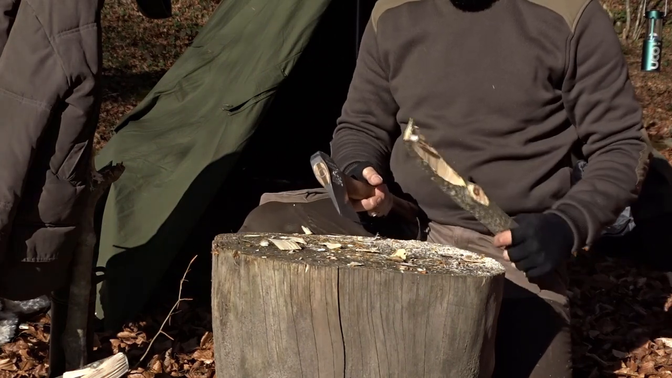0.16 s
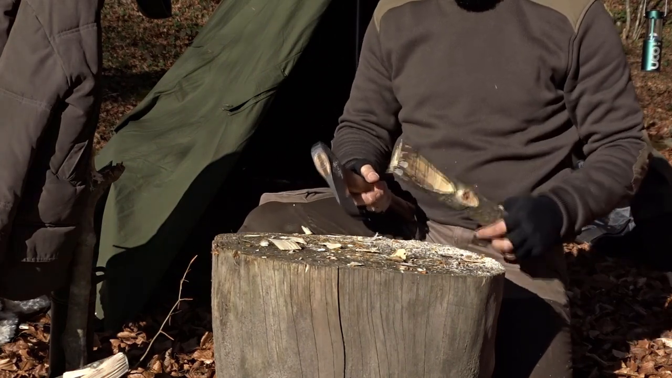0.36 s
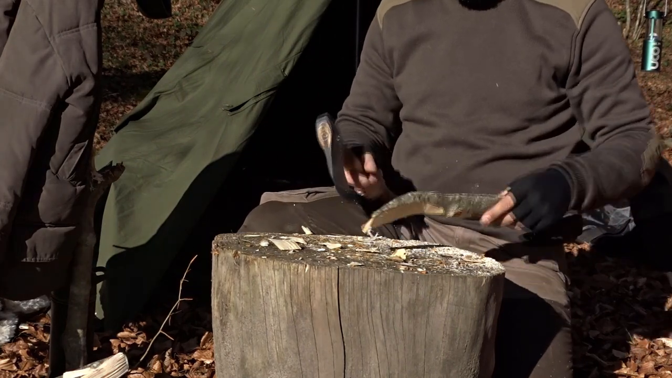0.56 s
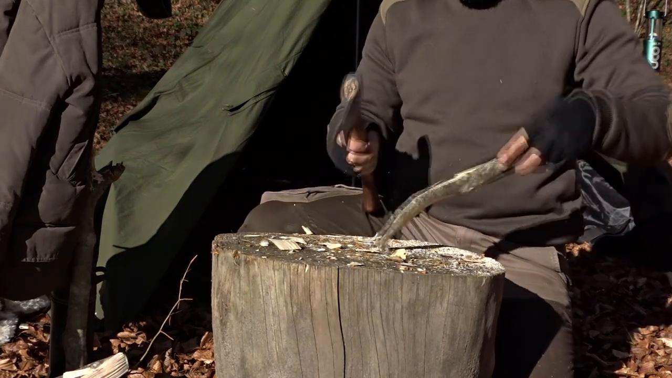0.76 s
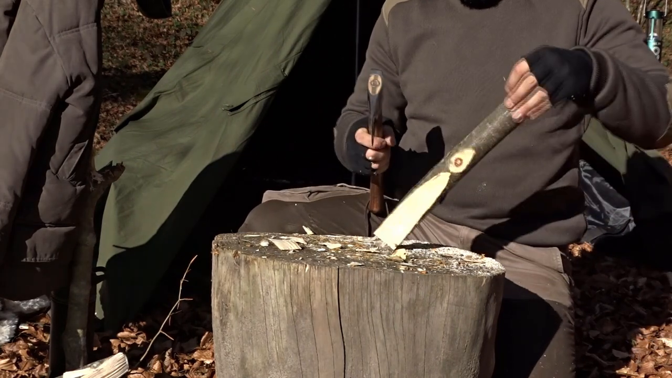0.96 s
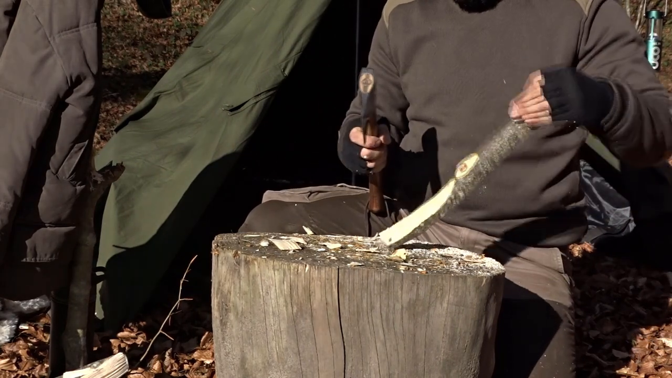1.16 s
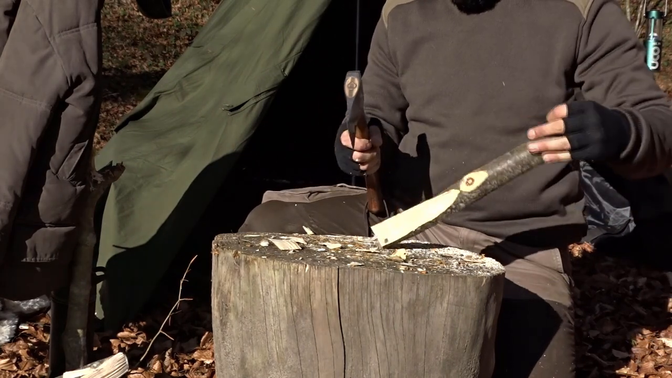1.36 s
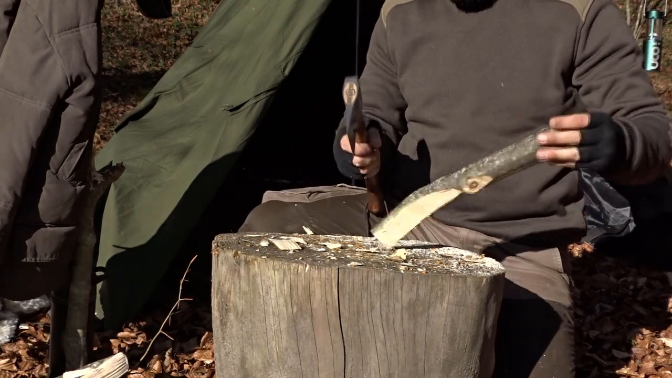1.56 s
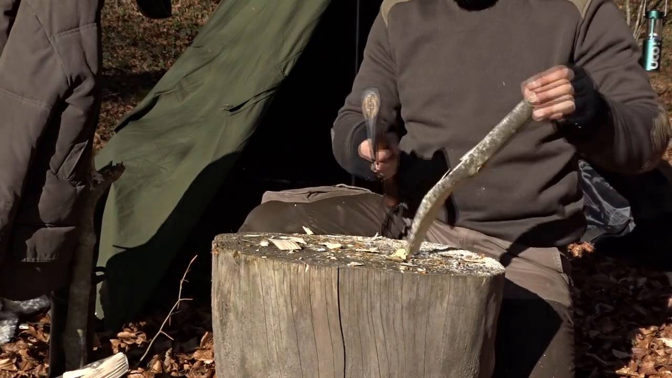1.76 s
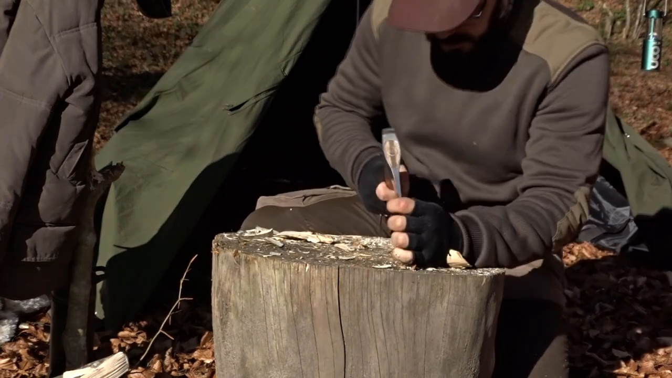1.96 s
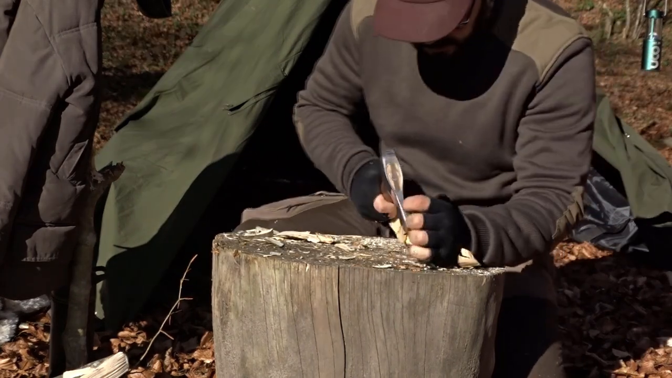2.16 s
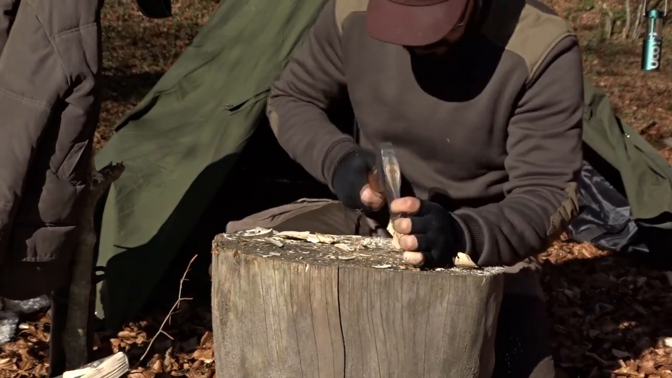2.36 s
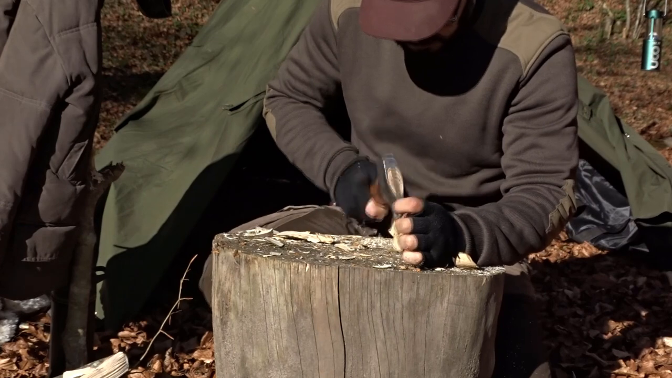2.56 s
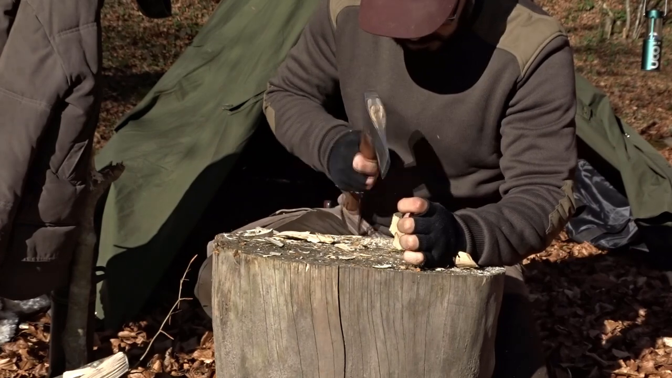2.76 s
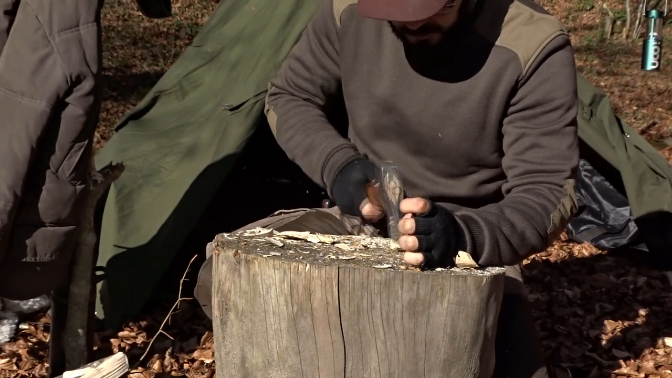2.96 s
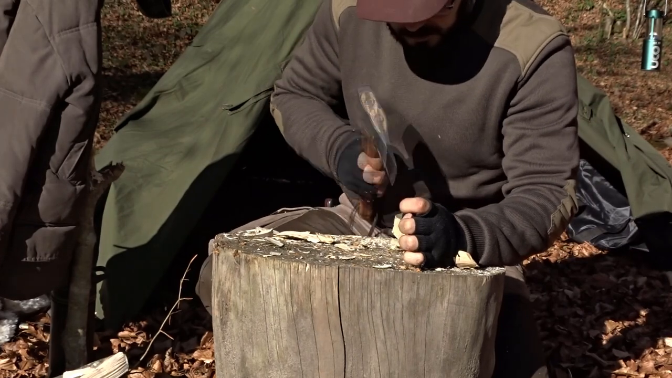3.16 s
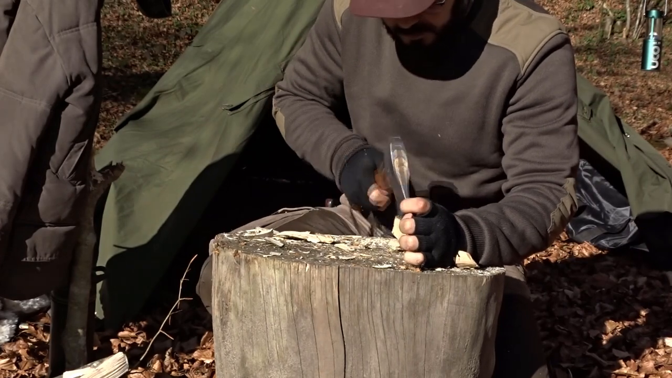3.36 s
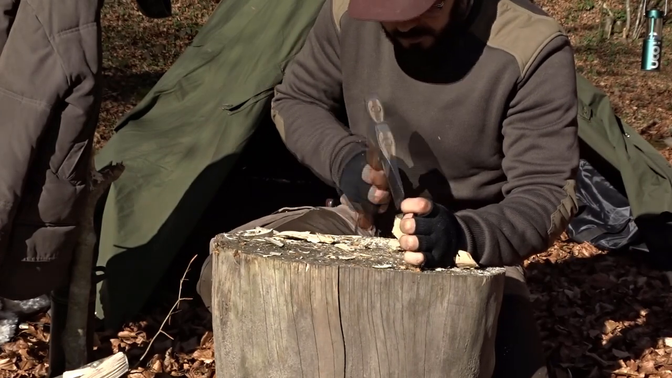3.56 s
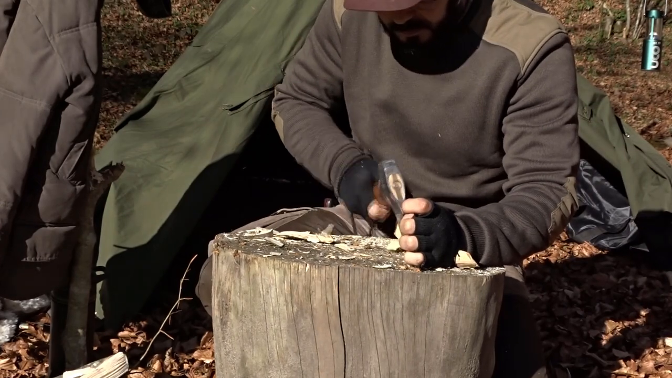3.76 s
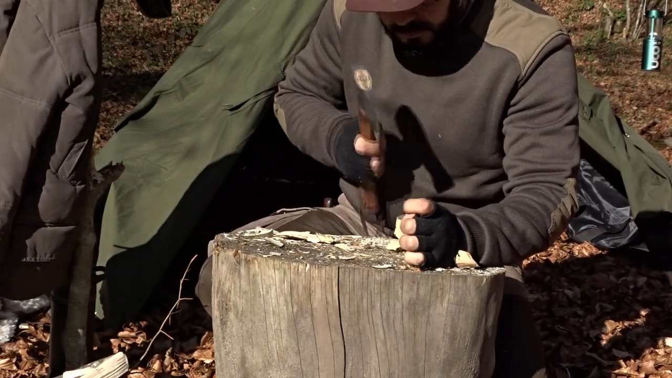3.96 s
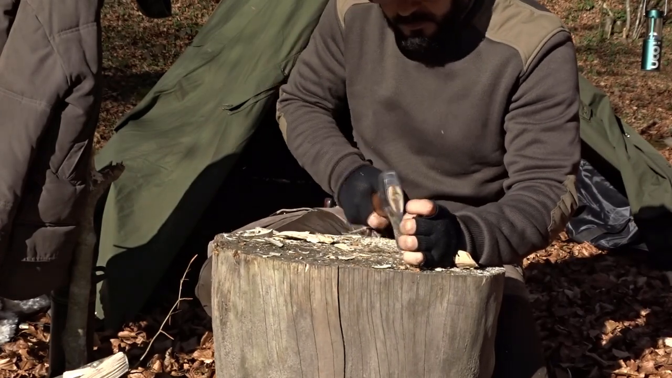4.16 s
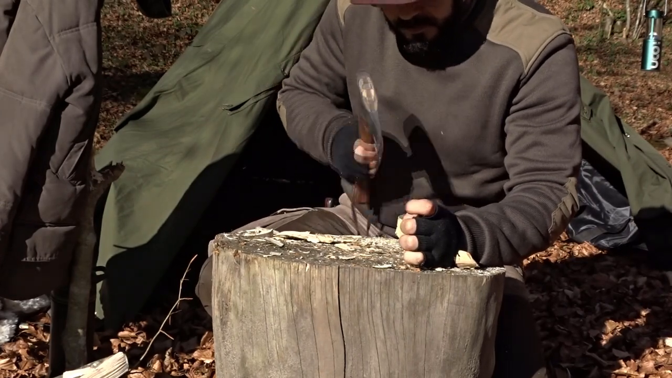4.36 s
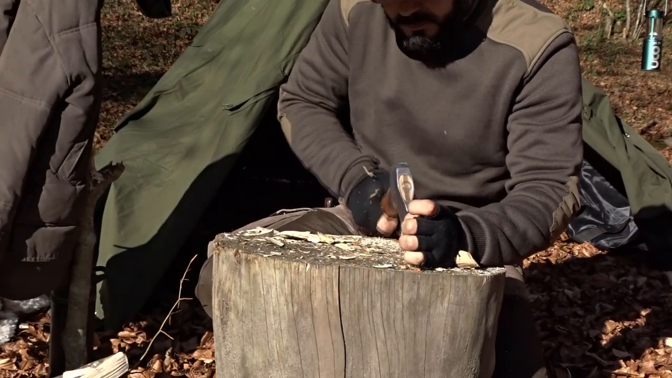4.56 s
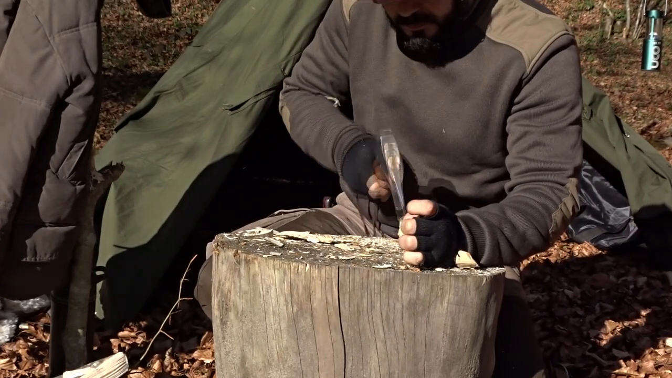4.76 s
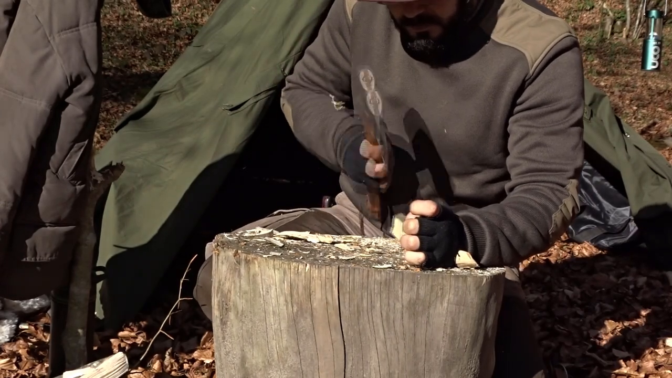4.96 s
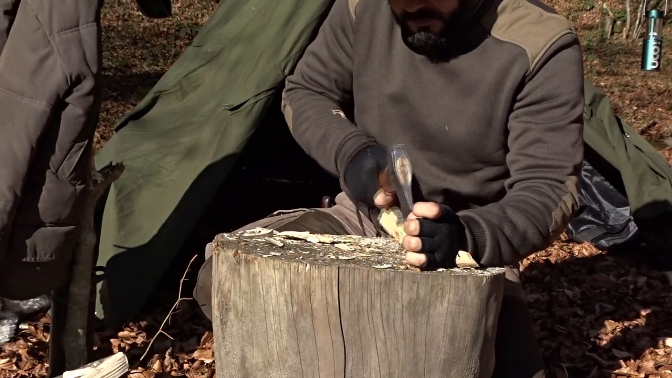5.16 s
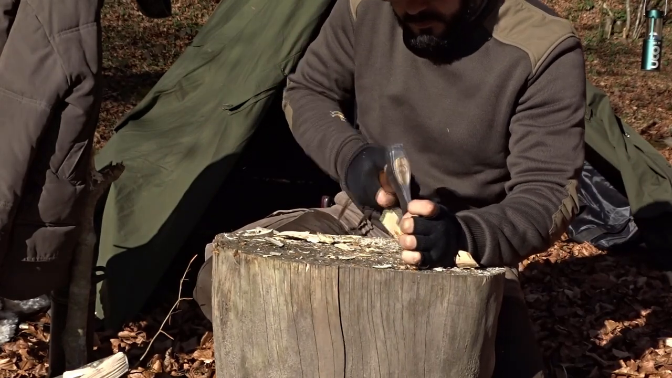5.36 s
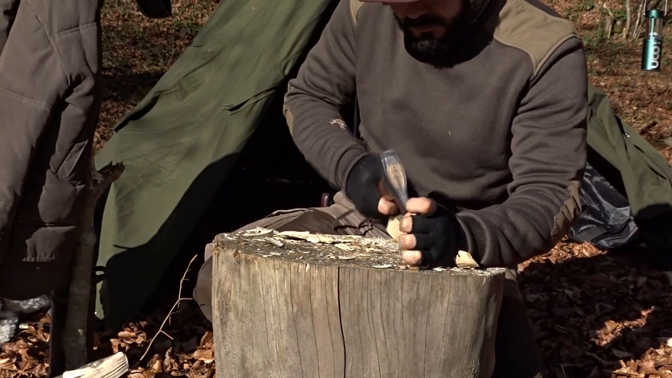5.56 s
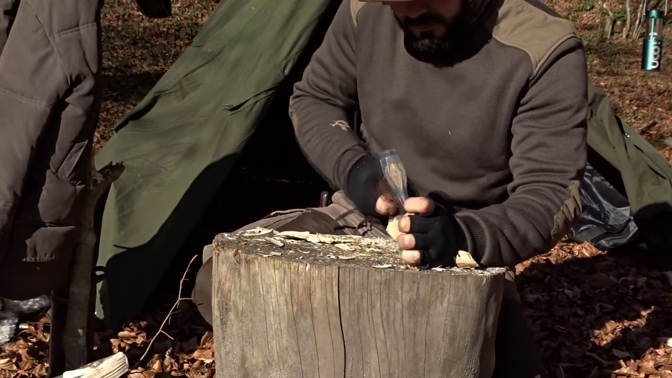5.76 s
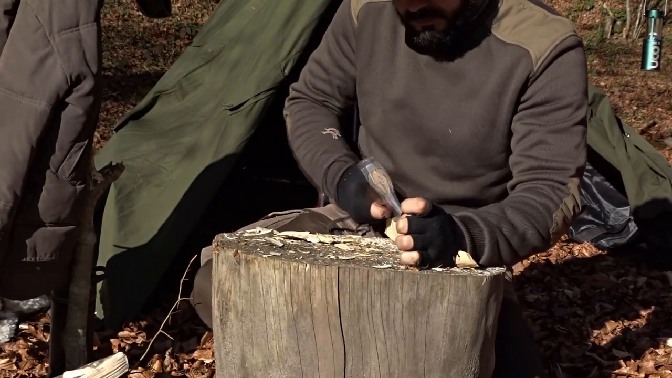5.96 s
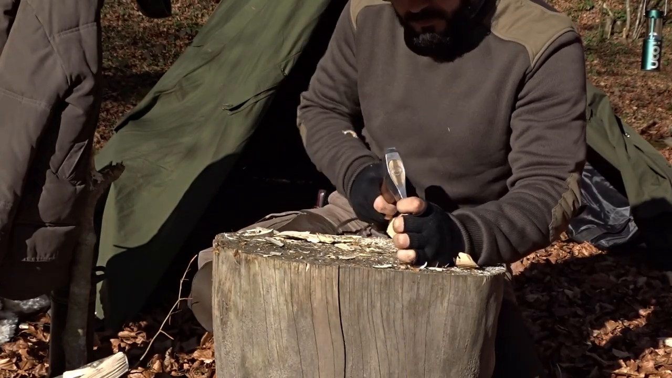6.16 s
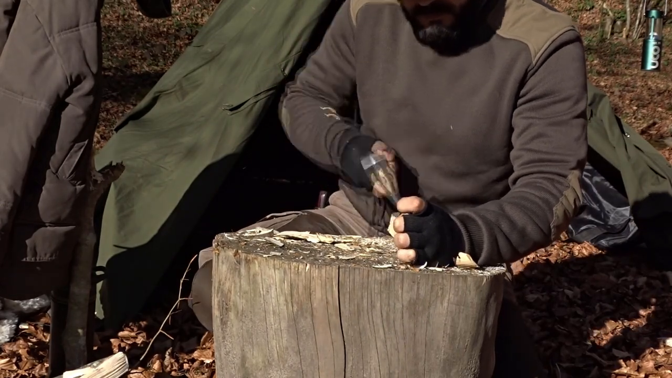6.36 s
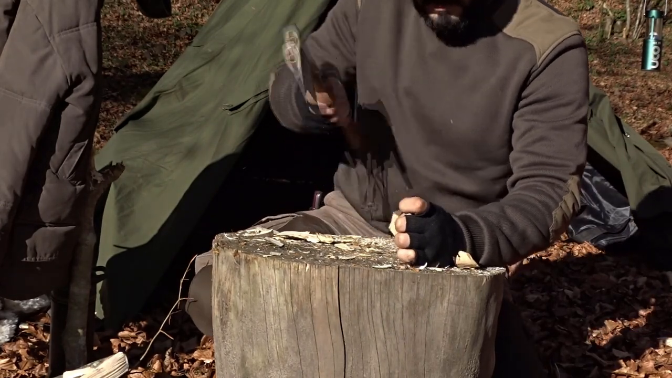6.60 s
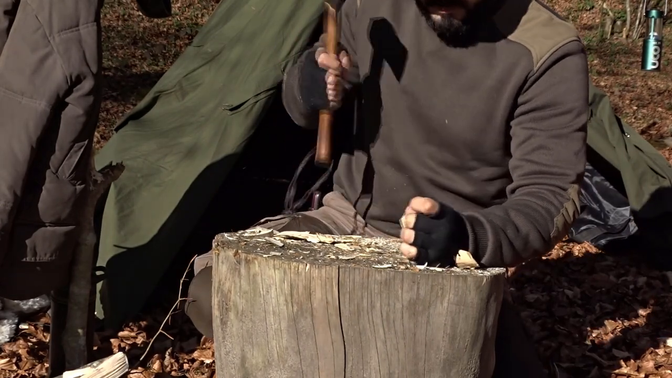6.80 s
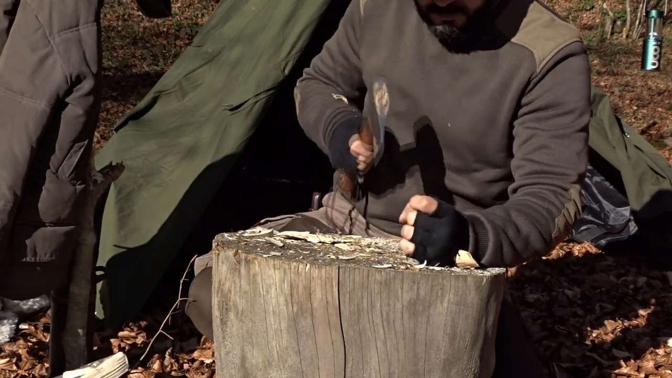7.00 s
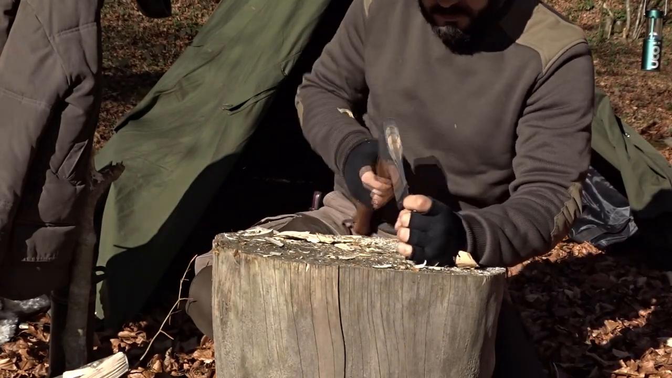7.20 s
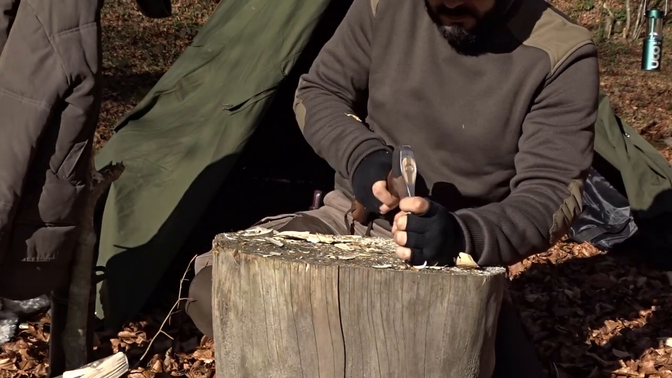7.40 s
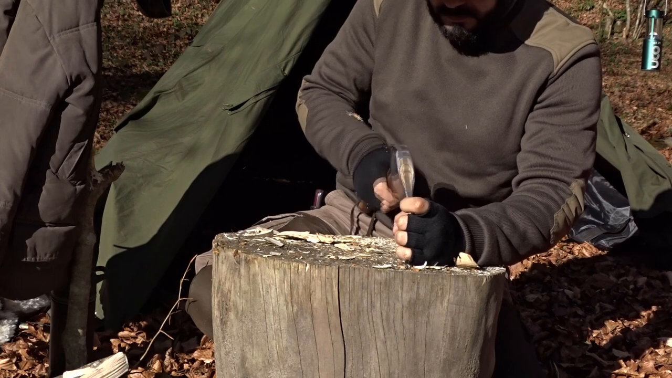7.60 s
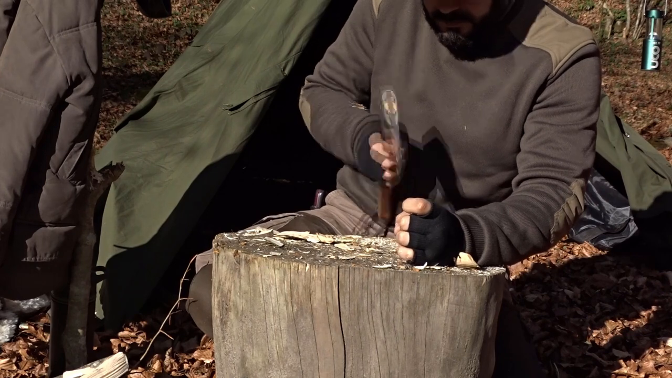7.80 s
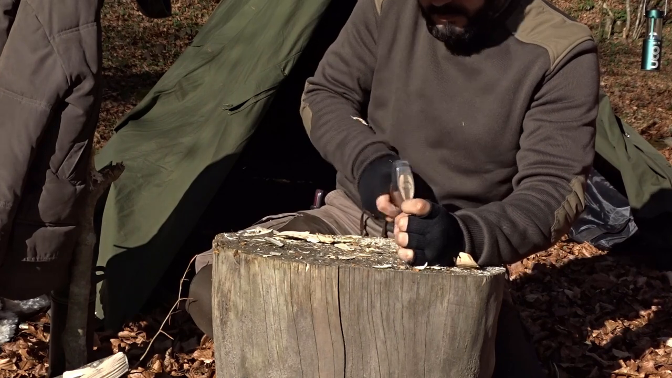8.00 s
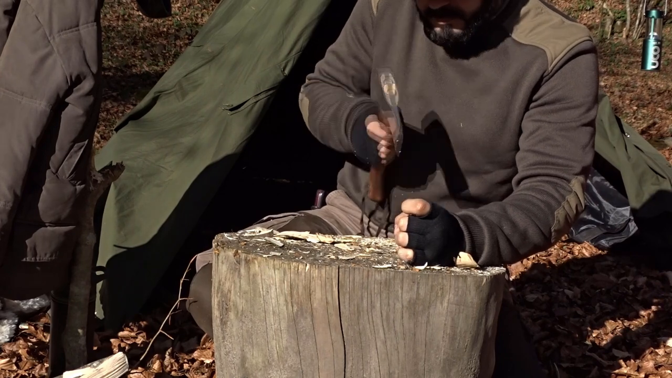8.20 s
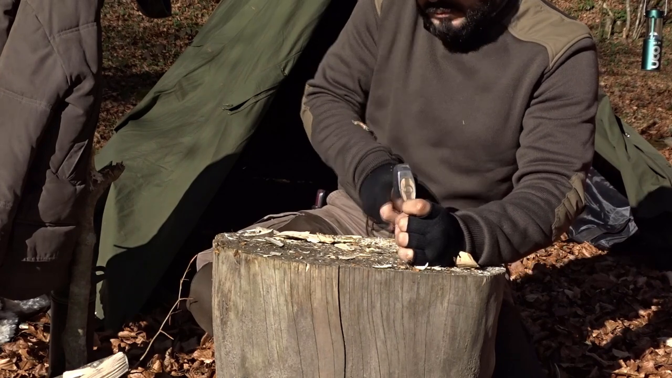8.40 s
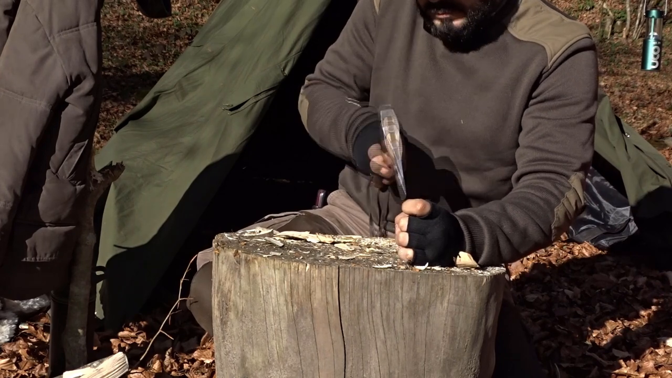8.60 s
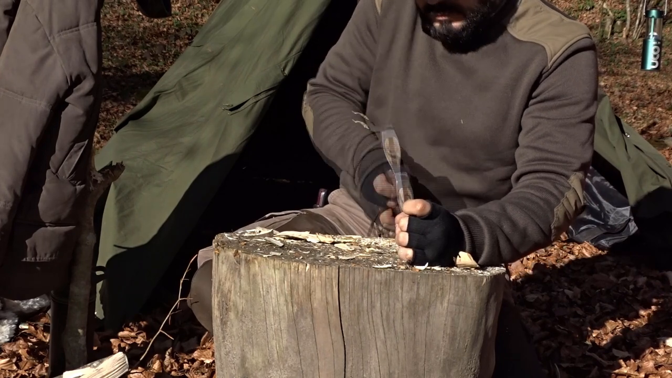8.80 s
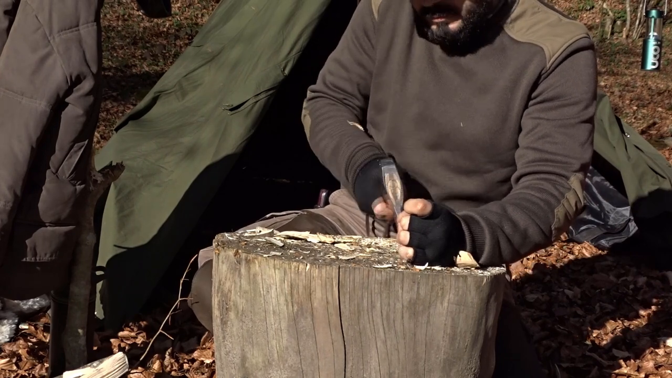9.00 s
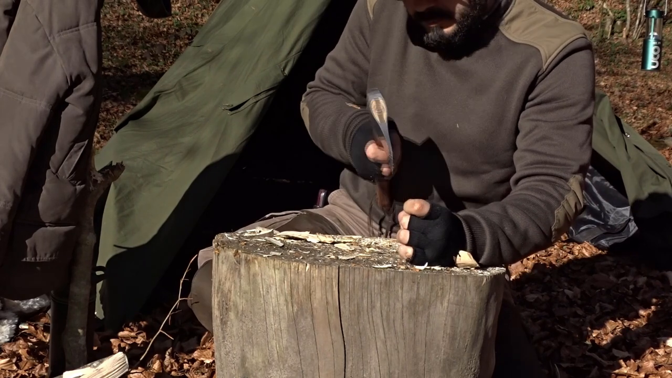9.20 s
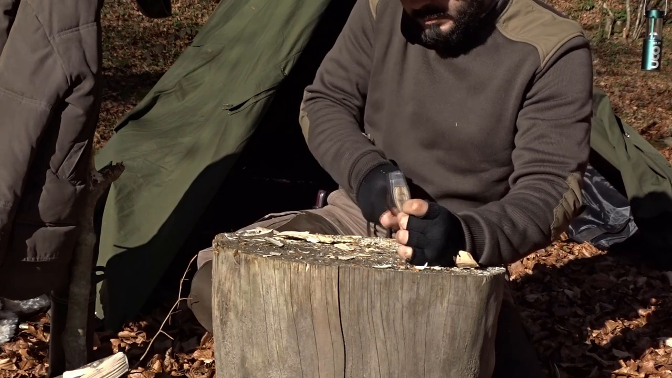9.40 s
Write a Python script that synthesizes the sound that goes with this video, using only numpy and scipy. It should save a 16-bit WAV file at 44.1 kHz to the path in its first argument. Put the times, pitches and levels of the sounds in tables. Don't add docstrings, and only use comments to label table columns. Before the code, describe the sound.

Close, dry chopping in a wood: each blow is a tight flurry of dead wooden knocks, splinter cracks and a tiny metallic clink. Two runs are separated by nearly three seconds of leaf and chip ticks. A distant bird scolds before the first, a thin high whistle warbles during the second. Soft breeze and traffic hum throughout, microphone a few steps away.

```python
import sys
import numpy as np
from scipy import signal
from scipy.fft import rfft, irfft
from scipy.io import wavfile
from scipy.ndimage import uniform_filter1d

SR = 44100
rng = np.random.default_rng(int(sys.argv[2]) if len(sys.argv) > 2 else 0)


def store_pcm(level_fs):
    pcm = np.round(np.clip(level_fs, -1, 1) * 32767).astype(np.int16)
    wavfile.write(sys.argv[1], SR, np.atleast_2d(pcm).T)


def ratio(d):
    e = np.asarray(d, float) / 20
    return 10 ** e


N = 416744

# start_s [s], lowest_hz [Hz], second_hz [Hz], third_hz [Hz], top_hz [Hz]
BLOWS = [(2.6493, 541.0, 736, 1960, 3000), (2.9594, 550, 900, 1580, 2589.0), (3.3054, 404, 810, 1390, 2120),
         (3.688, 558, 803, 1715, 2220), (4.1457, 496, 876, 1747, 2205), (4.5984, 503, 872, 1406, 2340),
         (5.105, 633, 808, 2200, 2620), (7.9606, 534, 1020, 1695, 2410), (8.4313, 606, 820, 1740, 2180),
         (8.907, 455, 1020, 1770, 2760), (9.385, 454, 1000, 1200, 2480)]
# ground_thud_db [dB], block_knock_db [dB], butt_freedom_db [dB]
THUDS = [(-58, -43, 0), (-45.5, -37.5, 0), (-40.5, -38.5, -3), (-41, -33.5, 2), (-41.5, -33, 1),
         (-41, -37.5, -18), (-38.5, -35.5, 4.5), (-44, -38.5, 1), (-44, -37, 0), (-39, -30, 0),
         (-40, -32.5, 0)]


def colour(x, points):
    hz, db = np.transpose(points)
    log_hz = np.log(np.arange(N // 2 + 1) * SR / N + 1)
    gain_db = np.interp(log_hz, np.log(hz), db)
    return irfft(rfft(x) * ratio(gain_db), N)


def band(x, lo_hz, hi_hz):
    sos = signal.butter(3, [lo_hz, min(hi_hz, .45 * SR)], "bandpass", fs=SR, output="sos")
    return signal.sosfilt(sos, x) * np.sqrt(SR / 2 / (hi_hz - lo_hz))


def walk(rate):
    hold = int(SR / rate)
    steps = np.repeat(rng.standard_normal(N // hold + 1), hold)
    slewed = uniform_filter1d(uniform_filter1d(steps, hold), hold)
    return 0.72 * slewed[:N]


def fade(t60_s, rise_s):
    t = np.arange(int(t60_s * SR) + 8) / SR
    shape = (1 - np.exp(-t / rise_s)) * np.exp(-np.log(1000) * t / t60_s)
    return shape / shape.max()


def ring(hz, t60_s, rise_s):
    shape = fade(t60_s, rise_s)
    return shape * np.sin(2 * np.pi * hz * np.arange(len(shape)) / SR)


def scatter_noise(shape):
    return shape * rng.standard_normal(len(shape)) / np.sqrt(np.sum(shape ** 2))


def add(out, s, sound):
    i = int(s * SR)
    out[i:i + len(sound)] += sound[:max(N - i, 0)]


def branch():
    # butt_hz [Hz], side_hz [Hz], splinter_hz [Hz], edge_tick_db [dB over splinters]
    cuts = [(342, 620, 3930, 1.5), (400, 1020, 3400, -11), (330, 580, 4700, -4), (330, 1230, 3480, -19),
            (353, 980, 4400, -11), (420, 1100, 4000, -13), (290, 770, 4700, -4), (386, 850, 3900, -15),
            (300, 2500, 3600, -11.5), (364, 790, 3320, -10.5), (350, 800, 3100, -24)]
    # start_s [s], force_db [dB], hardness [octaves
    # over soft_hz], splinter_db [dB]
    slips = [(2.6493, -39, 0.5, -26), (2.6514, -22, .65, -30.5), (2.6556, -23.5, 1.5, -32.5),
             (2.66, -24.5, 0.041, -50), (2.9597, -29, 1.2, -27.5), (2.963, -13.5, 0.36, -25),
             (2.966, -18.5, 0.3, -23.5), (2.97, -23, 0, -19), (3.3057, -14, 0.8, -22.5),
             (3.309, -18.5, 1.4, -31.5), (3.311, -16, 0.2, -40), (3.687, -36, 2.2, -36),
             (3.6898, -7, .7, -29), (3.6916, -9, 1.8, -12), (3.696, -12, .5, -48),
             (4.1454, -5.5, 1.45, -19), (4.1491, -27, 2.5, -28), (4.1522, -8, .25, -30),
             (4.5986, -13.5, 0.67, -54), (4.6013, -5, 1.5, -15.5), (4.604, -11, 1.5, -13),
             (4.6075, -12.5, 0, -60), (5.105, -20, 1.2, -26), (5.1071, -12, 2, -24),
             (5.1085, -12.5, .7, -25), (5.1095, -15, -.2, -24), (5.114, -18, 0.23, -45),
             (7.9604, -8, 0.97, -60), (7.962, -10.5, 0.55, -22), (7.9663, -9, 1.82, -12.5),
                  (7.97, -20, 1.8, -35), (8.4315, -4, 1.9, -32), (8.432, -11, .8, -30),
                  (8.4335, -12, 1.9, -18.5), (8.4355, -17, 1.4, -18.5), (8.907, -24, 0.11, -30),
                  (8.909, -14.5, 1.76, -18.5), (8.9136, -4, 0.86, -23), (8.9177, -8.5, -0.22, -60),
                  (9.3845, -27.5, 1.3, -31), (9.3859, -8, .8, -21), (9.3884, -6.5, -0.072, -40),
                  (9.395, -24, .6, -57)]
    # start_s [s], force_db [dB], hardness [0-2], splinter_db [dB]
    bounces = [
        (2.990, -29, .1, -60),
        (4.637, -40, 1.2, -50),
        (8.467, -31, 1.9, -48),
        (8.474, -33, 1.9, -46),
        (8.483, -36, 1.8, -55),
        (8.511, -36, 1.8, -60),
    ]
    branch_t60_s = [0.023, 0.016, 0.018, 0.014, 0.01, 0.01]
    branch_db = [-5, -0.5, 0.66, -5, 0, 0.5]
    # pitch_hz [Hz], level_db [dB over splinters], t60_s [s]
    head_modes = [(3560, -13, .016), (4470, -18, .018), (6100, -24, .02), (7070, -24, .025),
                  (9200, -26, .022)]
    soft_hz, fall_db_per_oct2, fall_max_db = 500, 16.5, 29

    out = np.zeros(N)
    for s, force_db, hardness, splinter_db in slips + bounces:
        blow = np.argmin(abs(np.array(BLOWS)[:, 0] - s))
        _, low_hz, second_hz, third_hz, top_hz = BLOWS[blow]
        butt_hz, side_hz, splinter_hz, edge_db = cuts[blow]
        modes_hz = np.array([butt_hz, low_hz, second_hz, side_hz, third_hz, top_hz])
        octaves_off = np.log2(modes_hz / soft_hz) - hardness
        fall_db = np.minimum(fall_db_per_oct2 * octaves_off ** 2, fall_max_db)
        modes_db = force_db - fall_db + branch_db
        modes_db[0] += THUDS[blow][2]
        detune = 1 + .025 * rng.standard_normal(len(modes_hz))
        for hz, db, t60_s in zip(modes_hz * detune, modes_db, branch_t60_s):
            add(out, s, ratio(db - 1.5) * ring(hz, t60_s, 0.001))
        for (hz, db, t60_s), size in zip(head_modes, rng.standard_normal(len(head_modes))):
            add(out, s, ratio(splinter_db + db + 1.7 * size) * ring(hz, t60_s, 0.00011))

        burst = fade(0.013, 0.00061)
        grit = rng.standard_normal((3, 1000)) * ratio(3.3 * rng.standard_normal((3, 1000))) / 1.375
        tear, edge, crunch = grit[:, :len(burst)] * burst
        add(out, s, ratio(splinter_db - 3.5) * band(tear, 0.62 * splinter_hz, 1.21 * splinter_hz))
        add(out, s, ratio(splinter_db + edge_db - 2.5) * band(edge, 5100, 9350))
        add(out, s, ratio(max(modes_db[2:]) - 11.5) * band(crunch, 800, 2400))
    return signal.sosfilt(signal.butter(2, 130, "highpass", fs=SR, output="sos"), out)


def stump():
    # pitch_hz [Hz], level_db [dB over the thud], t60_s [s], delay_s [s], rise_s [s]
    ground_modes = [(72, 1, 0.25, 0.0196, 0.01), (106.4, -6, 0.18, 0.021, .008),
                    (161.8, -5, 0.34, 0.0133, 0.0099)]
    # pitch_hz [Hz], level_db [dB over the knock], t60_s [s], delay_s [s], rise_s [s]
    block_modes = [(221.5, 0.5, 0.024, 0.0035, 0.006), (303.5, 2, 0.057, 0.00733, 0.0067),
                   (397, 5.5, 0.041, 0.0127, 0.0018), (502, -3.5, 0.063, 0.01092, 0.0041)]
    out = np.zeros(N)
    for (s, *_), (thud_db, knock_db, _) in zip(BLOWS, THUDS):
        for modes, blow_db in ((ground_modes, thud_db), (block_modes, knock_db)):
            scatter = rng.standard_normal((len(modes), 2))
            for (hz, db, t60_s, delay_s, rise_s), (pitch, size) in zip(modes, scatter):
                swing = ring(hz * (1 + .03 * pitch), t60_s, rise_s)
                add(out, s + delay_s, ratio(blow_db + db + 2.0 * size) * swing)
    return signal.sosfilt(signal.butter(2, 45, "highpass", fs=SR, output="sos"), out)


def wood(x):
    # delay_s [s], level_db [dB]
    trunks = [(.0355, -28), (.041, -31), (.051, -32), (.078, -33), (.11, -38)]
    tail_db, tail_t60_s, tail_gap_s = -21.5, 0.76, 0.021
    bark_s = 0.0038
    response = np.zeros(N)
    add(response, tail_gap_s, ratio(tail_db) * scatter_noise(fade(tail_t60_s, 0.0064)))
    for delay_s, db in trunks:
        add(response, delay_s, ratio(db) * scatter_noise(fade(bark_s, .0001)))
    dull = colour(x, [(200, -1.5), (700, -10), (1600, -8), (5000, -6.5), (10000, -7.5)])
    return signal.fftconvolve(dull, response[:SR])[:N]


def leaves():
    # start_s [s], peak_db [dB], centre_hz [Hz], length_s [s]
    ticks = [(.335, -63, 7000, .025), (0.361, -44, 6500, 0.005), (0.468, -62, 7500, 0.064),
             (.815, -67, 8500, 0.036), (.870, -60, 8500, 0.0027), (1.525, -63, 9000, .004),
             (1.638, -57, 5970, 0.053), (1.645, -69, 12000, .05), (2.344, -55, 8400, 0.0044),
             (2.549, -62, 8600, 0.0045), (2.741, -54, 7700, .008), (3.426, -55, 7040, .008),
             (4.528, -50, 7540, 0.0053), (6.219, -62, 8000, .008), (6.426, -57, 7000, 0.035),
             (6.45, -54, 6500, .005), (6.498, -60, 8000, .004), (6.597, -58, 4800, .03),
             (6.619, -49, 6000, 0.0026), (6.68, -59.5, 5500, 0.047), (6.726, -57, 7500, .005),
             (6.853, -59, 6500, .015), (6.996, -60, 8000, .005), (7.385, -64, 8500, 0.013),
             (7.56, -48.5, 6000, 0.0043), (7.586, -45.5, 4500, 0.0048), (9.28, -60, 8060, 0.005)]
    out = np.zeros(N)
    for s, db, hz, length_s in ticks:
        swell = np.pad(np.hanning(int(length_s * SR) + 8), (0, 100))
        grains = np.repeat(ratio(2.1 * rng.standard_normal(50)), 80)
        grit = (rng.standard_normal(4000) * grains)[:len(swell)]
        add(out, s, ratio(db) * band(grit * swell, 0.6 * hz, 1.14 * hz))
    return out


def smear(x):
    return signal.fftconvolve(x, scatter_noise(fade(0.64, 0.015)))[:N]


def whistler():
    # start_s [s], pitch_hz [Hz], level_db [dB]
    whistles = [
        [(1.665, 7982, -73), (1.677, 8062, -65), (1.685, 8442, -65), (1.701, 8570, -62), (1.76, 8576, -81)],
        [(7.48, 8261, -73), (7.534, 8200, -77), (7.542, 7945, -84), (7.55, 7502, -77)],
        [(8.755, 6300, -73), (8.779, 7607, -68), (8.805, 7450, -56), (8.822, 7100, -63), (8.835, 7570, -67),
         (8.858, 7150, -62), (8.877, 7777, -62), (8.9, 7535, -69)],
        [(8.925, 6731, -65), (8.985, 6329, -73), (8.998, 6790, -66), (9.02, 7200, -63), (9.038, 7370, -63),
         (9.077, 7385, -71), (9.087, 6507, -77), (9.1, 6307, -72)],
    ]
    time_s = np.arange(N) / SR
    out = np.zeros(N)
    for call in whistles:
        s, hz, db = np.transpose(call)
        edge = np.interp(time_s, [s[0] - .006, s[0], s[-1], s[-1] + .012], [0, 1, 1, 0])
        pitch_hz = np.interp(time_s, s, hz) * (1 + .024 * walk(200))
        phase = 2 * np.pi * np.cumsum(pitch_hz) / SR
        broken_db = 7 * walk(70)
        level = edge * ratio(np.interp(time_s, s, db) + 1 + broken_db)
        out += level * (np.sin(phase) + ratio(-8) * np.sin(2 * phase))
    return out + ratio(-4) * smear(out)


def scolder():
    # start_s [s], length_s [s], fundamental_hz [Hz], level_db [dB]
    scolds = [
        (1.73, 0.063, 1487, -61),
        (1.848, 0.059, 1500, -60),
        (2.0, 0.079, 1500, -64),
        (2.145, 0.051, 1496, -61.5),
        (2.244, .04, 1510, -69),
        (2.293, 0.059, 1500, -63),
        (2.424, 0.061, 1520, -59.5),
    ]
    # multiple [of fundamental], level_db [dB]
    partials = [(3, 3), (4, -2.5), (5, -9), (9, -2)]
    out = np.zeros(N)
    jitter, hoarse = walk(500), ratio(4 * walk(120))
    breath = band(rng.standard_normal(N), 2700, 7700)
    for s, length_s, hz, db in scolds:
        shape = np.hanning(int(1.4 * length_s * SR)) ** 0.36
        part = slice(int(s * SR), int(s * SR) + len(shape))
        droop = np.linspace(1.04, .96, len(shape))
        phase = 2 * np.pi * np.cumsum(hz * droop * (1 + .065 * jitter[part])) / SR
        stack = sum(ratio(part_db) * np.sin(k * phase) for k, part_db in partials)
        voice = stack * hoarse[part] + ratio(-4) * breath[part]
        add(out, s - .01, ratio(db) * shape * voice)
    return out + ratio(-3.0) * smear(out)


def air():
    # pitch_hz [Hz], level_db [dB per Hz]
    air_spectrum = [(20, -7), (45, -9.5), (73, 0), (100, -4), (170, -6.5), (300, -9), (900, -5.5),
                    (1200, -7.5), (1900, -13.5), (2900, -14), (3600, -18.5), (6100, -25), (8200, -32.5),
                    (11500, -48), (15000, -54)]
    # pitch_hz [Hz], side_minus_mid_db [dB]
    side_spectrum = [(40, -7), (60, -11), (110, -12), (190, -13.5), (340, -18.5), (610, -24), (1080, -28.5),
                     (1930, -23.5), (3440, -17), (6120, -12.5), (10000, -6.5), (12500, 0)]
    mid = colour(rng.standard_normal(N), air_spectrum)
    side = colour(rng.standard_normal(N), air_spectrum)
    low = colour(mid, [(150, 10.0), (300, -50)])
    mid = low * ratio(0.58 * walk(3.5)) + (mid - low) * ratio(.5 * walk(1.38))
    side = colour(side, side_spectrum) * ratio(2.1 * walk(1.17))
    side = side + colour(mid, [(30, -16), (100, -11), (250, -42)])
    return ratio(-47) / np.std(mid) * np.array([mid, side])


def scene():
    # pitch_hz [Hz], level_db [dB]
    mic_loss = [(9500, 1), (10500, 2), (12000, -8), (16000, -38)]
    chop = branch()
    near, far = whistler(), scolder()
    mid = colour(chop + stump() + wood(chop) + leaves() + near + far, mic_loss)
    side = colour(ratio(-16) * near + ratio(-10) * far, mic_loss)
    mid, side = air() + np.array([mid, side])
    return np.array([mid + side, mid - side])


def top_cut(x):
    return signal.sosfilt(signal.butter(12, 15700, fs=SR, output="sos"), x)


def record(dry):
    limited = 1.118 * np.tanh(dry / 1.102)
    return top_cut(limited)


dry = scene()
out = record(dry)
store_pcm(out)
```